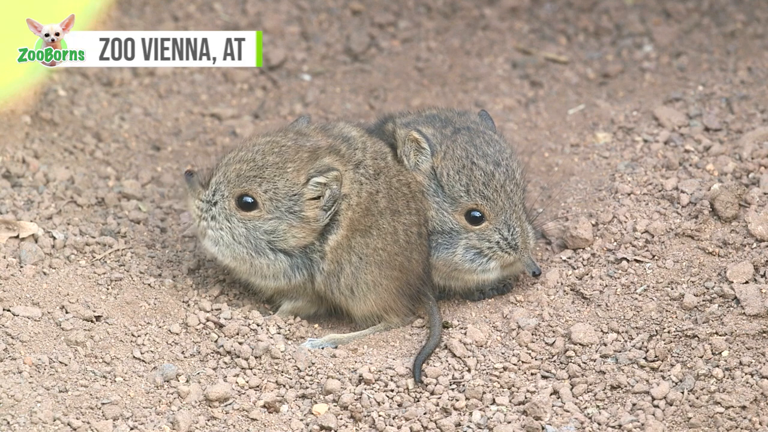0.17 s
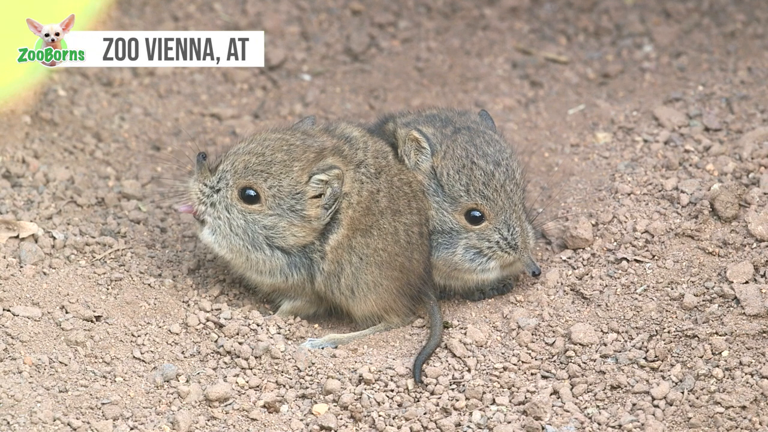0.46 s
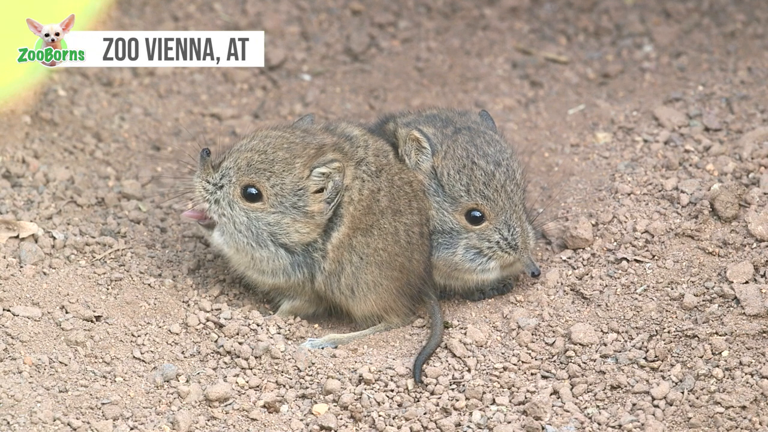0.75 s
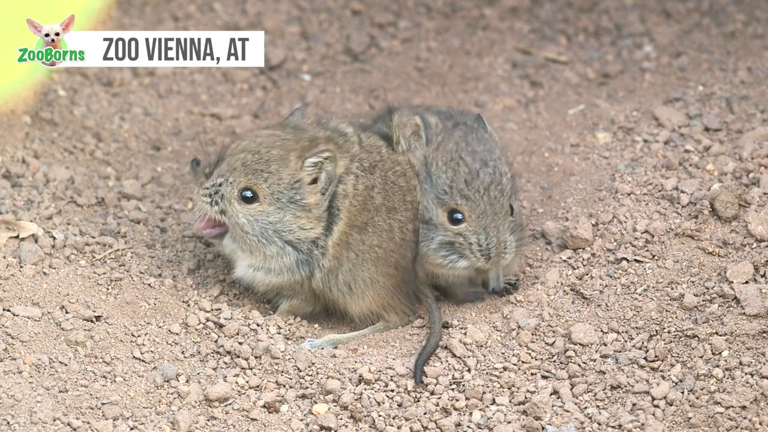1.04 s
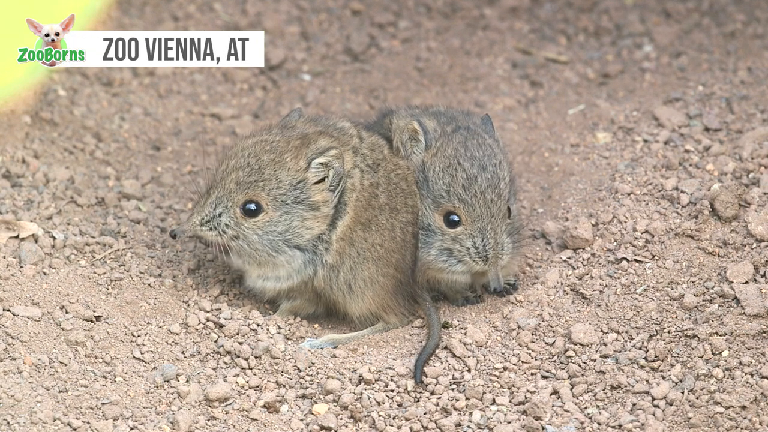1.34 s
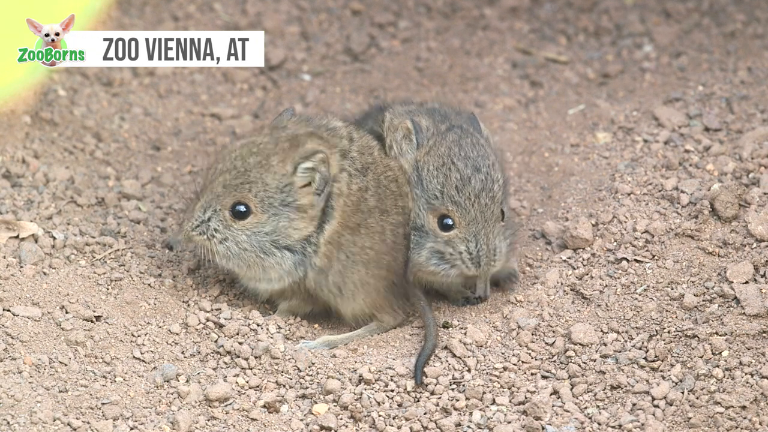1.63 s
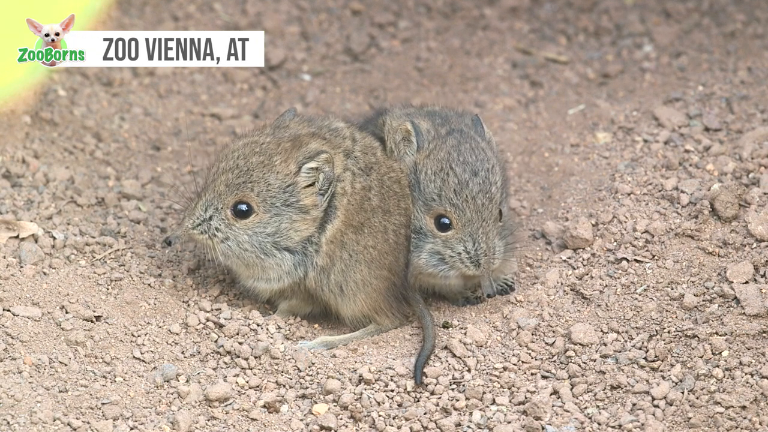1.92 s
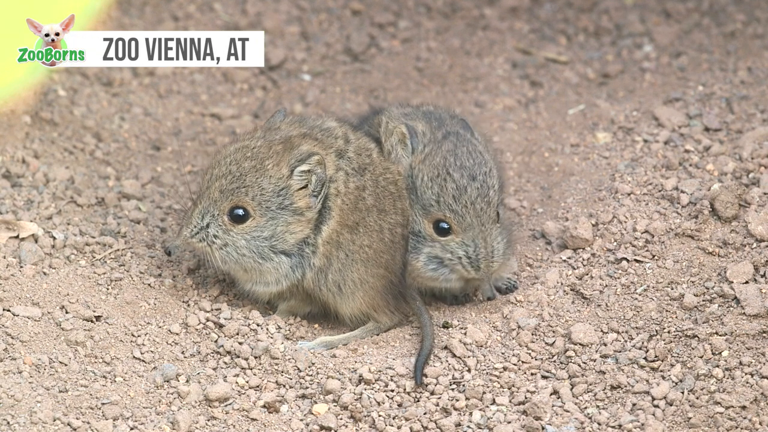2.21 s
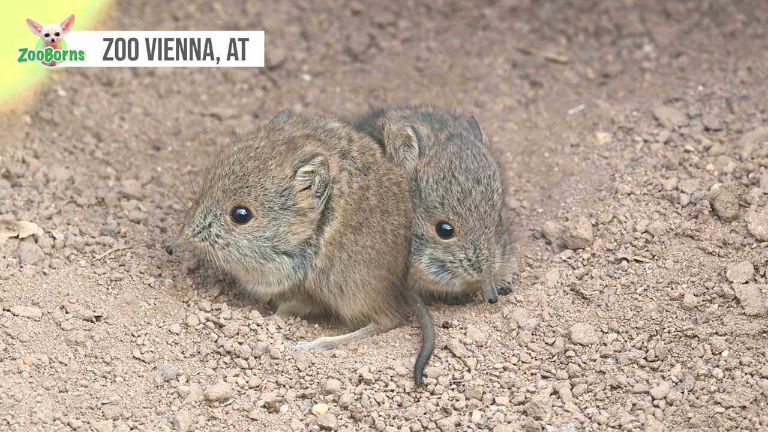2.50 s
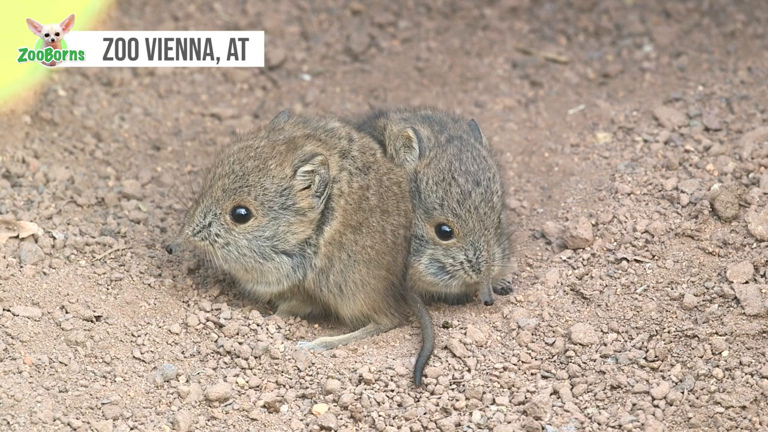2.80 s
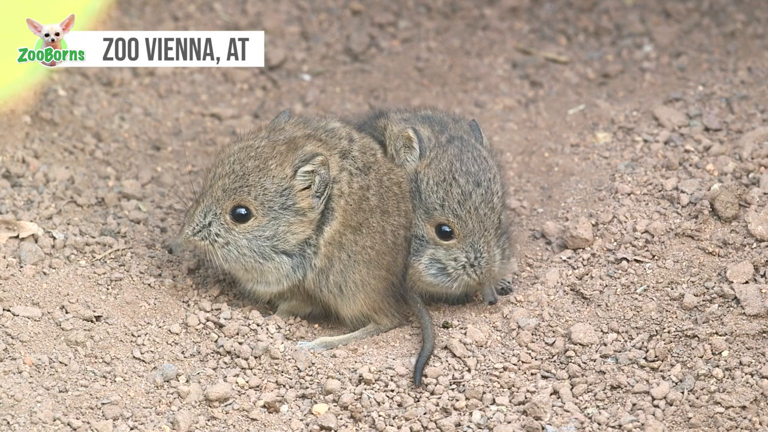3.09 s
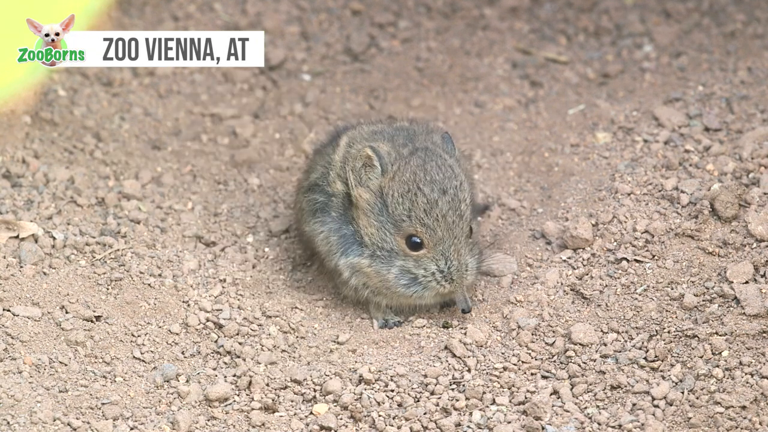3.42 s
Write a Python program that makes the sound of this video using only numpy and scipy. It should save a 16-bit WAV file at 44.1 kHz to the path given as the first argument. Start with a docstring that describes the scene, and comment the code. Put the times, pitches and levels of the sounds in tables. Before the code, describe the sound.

Small birds chirp and twitter in an echoing indoor enclosure, over a distant flock and faint ventilation. In the first second a near bird gives two thin whistles, while others screech and rasp farther off and a nasal call breaks upward. Low squawks join at 1.3 seconds, and the calls ease around 2. From 2.5 seconds come another nasal call, a steeply falling chirp and a last flurry.

```python
"""Small birds call across an echoing indoor enclosure, in mono, over faint ventilation and a far flock.
In the first second a near bird gives two thin whistles, while others chirp, screech and rasp farther
off and a nasal call breaks upward. Low squawks join at 1.3 s, and the calls ease off around 2 s.
From 2.5 s come a second nasal call, a steeply falling chirp and a last flurry. The voices are
fluttering tones and shaped noise, each ringing on in the hall."""
import sys
import numpy as np
from scipy import signal
from scipy.fft import rfft, irfft, next_fast_len
from scipy.io import wavfile
from scipy.ndimage import map_coordinates

SR = 44100
rng = np.random.default_rng(int(sys.argv[2]) if len(sys.argv) > 2 else 0)


def waveform_to_disk(signal):
    """Save audio, clipped to [-1, 1], as 16-bit WAV at the path in sys.argv[1]."""
    frames = np.transpose(np.atleast_2d(signal))
    scaled = np.clip(frames, -1, 1) * 32767
    samples = np.round(scaled).astype(np.int16)
    wavfile.write(sys.argv[1], SR, samples)


N = 156555
LEAD = SR // 2  # pre-roll, so the hall is already ringing at the start
TIME = np.arange(-LEAD, N + SR) / SR


def amp(db):
    """Decibels to gain."""
    return 10 ** (np.asarray(db) / 20)


def unit(x):
    """Scale to rms 1."""
    return x / np.sqrt(np.mean(x ** 2) + 1e-20)


def along(points, hz):
    """Read a curve of (freq_hz, value) points on a log frequency axis."""
    freqs, values = np.transpose(points)
    return np.interp(np.log(hz + 1), np.log(freqs + 1), values)


def fader(points):
    """Gain over the whole scene from (time_s, level_db) points."""
    return amp(np.interp(TIME, *np.transpose(points)))


def wobble(size, rate_hz):
    """A smooth random curve with rate_hz knots a second."""
    knots = rng.standard_normal(size // 4 + 8)
    return map_coordinates(knots, [np.arange(size) * rate_hz / SR], mode='mirror')


def noise(size, colour):
    """Noise of rms 1, shaped by an EQ curve."""
    eq = amp(along(colour, np.fft.rfftfreq(size, 1 / SR)))
    return unit(irfft(rfft(rng.standard_normal(size)) * eq, size))


def note(length_s, edge=0.147):
    """Progress 0-1 through a note, and an envelope whose fades each take the share `edge` of it."""
    progress = np.linspace(0, 1, int(length_s * SR))
    return progress, np.sin(np.pi / 2 * np.clip(np.minimum(progress, 1 - progress) / edge, 0, 1))


# Reverb time of the hall: freq_hz, t60_s
HALL_DECAY = [(300, 0.72), (1500, 2.58), (3500, 1.352), (5000, 1.232), (6500, 0.636), (12000, 0.414)]


def place_in_hall(track, start_s, call, direct_db, echo_db):
    """Mix in a call: the direct sound plus a diffuse tail whose mids ring longest."""
    hz, t, spectrum = signal.stft(rng.standard_normal(SR), SR, nperseg=256)
    decay = amp(-60 * t / along(HALL_DECAY, hz)[:, None])
    build_up = 1 - np.exp(-t / 0.0021)
    tail = signal.istft(spectrum * decay * build_up, SR, nperseg=256)[1]
    impulse = amp(echo_db) * tail / np.linalg.norm(tail)
    impulse[0] += amp(direct_db)
    part = track[LEAD + round(start_s * SR):]
    heard = signal.fftconvolve(call, impulse)[:len(part)]
    part[:len(heard)] += heard


# Second and third harmonic of a loud chirp, relative to its fundamental: gain_db
OVERTONES_DB = [-30, -38]


def syrinx(hz, rough, flutter_hz, shimmer_db, bright_db=-8.5):
    """A bird's voice: a tone with weak overtones, fluttering in pitch (by the share `rough`) and level."""
    phase = 2 * np.pi * np.cumsum(hz * (1 + rough * wobble(len(hz), flutter_hz))) / SR
    overtones = sum(amp(db + bright_db) * np.sin(k * phase) for k, db in enumerate(OVERTONES_DB, 2))
    shimmer = amp(shimmer_db * wobble(len(hz), 352.43))
    return unit((np.sin(phase) + overtones) * shimmer)


# EQ of the low rush and of the hiss: freq_hz, gain_db
RUSH_EQ = [(25, -8), (45, -1), (90, 0), (170, 2), (300, -5.5), (500, -8.5), (700, -7), (1100, -19.5),
           (3000, -37.5)]
HISS_EQ = [(1100, -6.5), (2200, 7.5), (6000, -1.5), (9000, -16.5), (15000, -29.5)]
# Fader moves of the rush and of the hum: time_s, level_db
RUSH_LEVELS = [(.2, -59), (1.55, -54.5), (2.4, -57.5), (3.5, -56.5)]
HUM_LEVELS = [(0, -84.5), (.3, -58.5), (1.3, -63.5), (3.0, -66.5), (3.5, -57)]


def ventilation(hum_hz=63.5, hiss_db=-54.5):
    """Room tone: a low rush of air, a faint hiss and a wavering hum."""
    size = len(TIME)
    hz = hum_hz * (1 + 0.02272 * wobble(size, 4.473))
    hum = np.sin(2 * np.pi * np.cumsum(hz) / SR) * amp(1.6 * wobble(size, 6.18))
    rush = fader(RUSH_LEVELS) * noise(size, RUSH_EQ)
    hiss = amp(hiss_db) * noise(size, HISS_EQ)
    return rush + hiss + fader(HUM_LEVELS) * unit(hum)


# Fader moves of the distant flock: time_s, level_db
FLOCK_LEVELS = [(0, -38.5), (.6, -46), (1.2, -42.5), (1.7, -42.5), (2.0, -48), (2.45, -47), (2.8, -37.5),
                (3.55, -44.5)]


def flock(count=110, centre_hz=3421, spread=.16):
    """A twittering bed: many far chirps blur in the hall."""
    twitter, out = np.zeros(len(TIME)), np.zeros(len(TIME))
    for k, (jitter, stretch, pitch, glide) in enumerate(rng.uniform(-1, 1, (count, 4))):
        progress, env = note(.07 + 0.03124 * stretch)
        hz = centre_hz * np.exp(spread * (1.6 * pitch + glide * (progress - .5)))
        onset = int((k + 1 + jitter) / count * (N + LEAD))
        twitter[onset:][:len(env)] += env * syrinx(hz, rough=.035, flutter_hz=897.6, shimmer_db=8.0)
    place_in_hall(out, -LEAD / SR, twitter, direct_db=-2.0, echo_db=4)
    return out / np.std(out[LEAD:LEAD + N]) * fader(FLOCK_LEVELS)


# Rasp cues: start_s, length_s, level_db
RASPS = [(0.297, 0.017, -58), (0.414, 0.253, -59.5), (0.775, 0.0425, -51), (0.901, 0.139, -52),
         (1.18, 0.064, -53), (1.327, 0.133, -53), (1.854, 0.085, -51), (2.083, 0.0744, -53.5),
         (2.515, 0.108, -53.5), (3.081, 0.164, -56), (3.306, 0.342, -57.5)]
# EQ of a rasp: freq_hz, gain_db
RASP_EQ = [(3000, -57), (5000, 10.5), (5900, 9), (7000, -1), (8500, -7.5), (12000, -18), (15500, -37.5)]


def rasps():
    """Toneless, trembling hisses that sit above the chirps."""
    out = np.zeros(len(TIME))
    for start_s, length_s, level_db in RASPS:
        _, env = note(length_s)
        hiss = unit(noise(len(env), RASP_EQ) * amp(1.9 * wobble(len(env), 200)))
        place_in_hall(out, start_s, amp(level_db) * env * hiss, direct_db=-1.5, echo_db=0.0)
    return out


# Squawk cues: start_s, length_s, edge_pitch_hz, top_pitch_hz, level_db
SQUAWKS = [(1.298, .16, 999, 1903, -43.5), (1.599, 0.21, 1650, 1789, -54.5),
           (3.079, 0.10974, 1604, 1899, -42.5), (3.17, 0.173, 1504, 1589, -52)]


def squawks():
    """Low hoarse calls whose pitch arches up and back down."""
    out = np.zeros(len(TIME))
    for start_s, length_s, edge_hz, top_hz, level_db in SQUAWKS:
        progress, env = note(length_s, edge=0.63)
        hz = edge_hz + (top_hz - edge_hz) * np.sin(np.pi * progress)
        tone = syrinx(hz, rough=0.0999, flutter_hz=700.4, shimmer_db=5)
        place_in_hall(out, start_s, amp(level_db) * env * tone, direct_db=-1.5, echo_db=-5.5)
    return out


# Nasal call cues: start_s, length_s, low_pitch_hz, high_pitch_hz, level_db
NASAL_CALLS = [(0.506, 0.466, 605.6, 1089, -42), (2.513, 0.413, 637.1, 1109, -43)]
# Throat resonance that shapes their harmonics: freq_hz, gain_db
NASAL_THROAT = [(600, -19), (1100, -14), (2300, -2), (3200, 1.5), (4500, -7.5), (7000, -37.5), (12000, -57)]


def nasal_calls(break_s=.17, break_width_s=.018, soft_start_db=-3, hoarseness=.125):
    """A soft reedy note breaks upward into a louder, hoarse one."""
    out = np.zeros(len(TIME))
    for start_s, length_s, low_hz, high_hz, level_db in NASAL_CALLS:
        progress, env = note(length_s, edge=0.181)
        broken = 1 / (1 + np.exp((break_s - progress * length_s) / break_width_s))  # 0 before, 1 after
        flutter = (0.0169 + hoarseness * broken) * wobble(len(env), 700)
        hz = (low_hz + (high_hz - low_hz) * broken) * (1 + flutter)
        phase = 2 * np.pi * np.cumsum(hz) / SR
        tone = unit(sum(amp(along(NASAL_THROAT, k * hz)) * np.sin(k * phase) for k in range(1, 11)))
        gain = amp(level_db + soft_start_db * (1 - broken))
        place_in_hall(out, start_s, gain * env * tone, direct_db=-3, echo_db=0)
    return out


# Screech cues: start_s, length_s, start_pitch_hz, end_pitch_hz, level_db
SCREECHES = [(-.1, 0.213, 3626, 3621, -44.5), (0.417, 0.203, 3969, 3200, -38),
             (.62, 0.16, 2785, 2600, -41.5), (.77, 0.1115, 4618, 3383, -40),
             (0.958, 0.141, 3768, 3550, -39.5), (1.308, 0.05344, 4867, 4457, -36),
             (1.351, 0.081, 3755, 3087, -38), (1.403, 0.1624, 3685, 3502, -36.5),
             (1.624, 0.1164, 3393, 3322, -42), (2.084, 0.0827, 4670, 3766, -45),
             (2.527, 0.24, 4337, 3805, -36), (2.75, 0.214, 4333, 3460, -42),
             (3.074, 0.058, 5313, 4590, -38), (3.099, 0.0807, 3923, 3416, -32.5),
             (3.196, 0.3334, 3820, 4268, -40)]
# Throat resonance that shapes their breath: freq_hz, gain_db
SCREECH_THROAT = [(1700, -27.5), (2600, -4), (3400, -1.5), (5000, -4.5), (5800, -22.5), (8000, -33.5),
                  (14000, -45)]


def screeches(breath_db=-0.5):
    """Torn, swelling cries, half rough tone and half rushing air, with plenty of echo."""
    out = np.zeros(len(TIME))
    for start_s, length_s, start_hz, end_hz, level_db in SCREECHES:
        progress, env = note(length_s, edge=0.304)
        hz = start_hz + (end_hz - start_hz) * progress
        tone = syrinx(hz, rough=0.08957, flutter_hz=1366.9, shimmer_db=0.0)
        breath = unit(noise(len(env), SCREECH_THROAT) * amp(2.46 * wobble(len(env), 297.46)))
        cry = unit(tone + amp(breath_db) * breath)
        place_in_hall(out, start_s, amp(level_db) * env * cry, direct_db=-1.5, echo_db=-2.0)
    return out


# Chirp cues: start_s, length_s, start_pitch_hz, end_pitch_hz, level_db (before roll-off), rough_share
CHIRPS = [(0.166, 0.078, 3502, 2861, -34.5, 0.0625), (0.228, 0.119, 2955, 3690, -41.5, 0.0615),
          (0.343, 0.0671, 3740, 3680, -34.5, 0.0187), (0.808, 0.0754, 3790, 3630, -36, 0.0317),
          (1.197, 0.085, 3215, 3418, -39.5, 0.049), (1.219, 0.042, 4380, 4270, -42, 0.0234),
          (1.347, .07, 3890, 2918, -35, 0.0609), (1.844, 0.0291, 3120, 2773, -41.5, 0.0533),
          (1.886, 0.06, 3000, 2957, -44, 0.04), (1.974, 0.1144, 2923, 2641, -49, 0.0514),
          (2.122, 0.064, 3467, 3500, -40.5, 0.0536), (2.124, 0.082, 4190, 4185, -56.5, 0.0134),
          (2.221, 0.21, 3507, 3111, -51.5, 0.0321), (2.366, 0.071, 1920, 2074, -60.5, 0.0234),
          (2.718, 0.1577, 5900, 2686, -32.5, 0.05194), (3.116, 0.0658, 3526, 2964, -34.5, 0.0405),
          (3.174, 0.1534, 2990, 2869, -42.5, 0.0322), (3.202, 0.0227, 1700, 835, -52.5, 0.13),
          (3.469, 0.068, 2900, 3074, -43, 0.026)]
# A chirp weakens at the top of its range: pitch_hz, gain_db
CHIRP_ROLLOFF = [(4800, 0.5), (5900, -26.5)]


def chirps(loud_db=-31, dulling_db_per_db=1.5):
    """Short gliding notes from the middle distance; the louder, the brighter."""
    out = np.zeros(len(TIME))
    for start_s, length_s, start_hz, end_hz, level_db, rough in CHIRPS:
        progress, env = note(length_s)
        hz = start_hz + (end_hz - start_hz) * progress
        bright_db = dulling_db_per_db * (level_db - loud_db)
        tone = syrinx(hz, rough, flutter_hz=692.5, shimmer_db=2.5, bright_db=bright_db)
        gain = amp(level_db + along(CHIRP_ROLLOFF, hz))
        place_in_hall(out, start_s, gain * env * tone, direct_db=0.0, echo_db=-3.5)
    return out


# Pulsing envelopes, one list per whistle: time_s, level_db
WHISTLE_LEVELS = [
    [(.12, -46), (.148, -27.5), (.163, -45), (.195, -30.5), (.212, -29), (.254, -55.5), (.272, -34),
     (.36, -41.5), (.405, -54.5)],
    [(.595, -50.5), (.617, -34), (.633, -38), (.647, -22.5), (.665, -46), (.686, -26.5), (.70, -49.5),
     (.713, -38), (.735, -34.5), (.756, -56), (.768, -40), (.795, -35.5), (.803, -45.5)],
]
# Tuning, one row per whistle: rest_pitch_hz, drop_hz, waver_share
WHISTLE_TUNING = [(4200, 86, 0.0022), (4239, 286.6, 0.0063)]


def whistles(settle_s=0.02713, push_s=.052, push_width_s=.022, relaxed_db=-17.5, shimmer_db=2):
    """A near bird settles down onto one thin note; its third harmonic sparkles on the first push."""
    out = np.zeros(len(TIME))
    for envelope, (rest_hz, drop_hz, waver) in zip(WHISTLE_LEVELS, WHISTLE_TUNING):
        times_s, levels_db = np.transpose(envelope)
        start_s = times_s[0]
        t = np.arange(0, times_s[-1] - start_s, 1 / SR)
        hz = (rest_hz + drop_hz * np.exp(-t / settle_s)) * (1 + waver * wobble(len(t), 230))
        phase = 2 * np.pi * np.cumsum(hz) / SR
        gain = amp(np.interp(t + start_s, times_s, levels_db) + shimmer_db * wobble(len(t), 239))
        push = np.maximum(np.exp(-((t - push_s) / push_width_s) ** 2), amp(relaxed_db))
        tone = gain * (np.sin(phase) + amp(-47) * np.sin(2 * phase))
        sparkle = gain.mean() * amp(-42.5) * push * np.sin(3 * phase)
        call = np.sqrt(2) * (tone + sparkle) * signal.windows.tukey(len(t), .06)
        place_in_hall(out, start_s, call, direct_db=0.0, echo_db=-9.5)
    return out


def scene():
    """All birds over the room tone, the same in both channels."""
    birds = whistles() + chirps() + screeches() + nasal_calls() + squawks() + rasps() + flock()
    mono = birds + ventilation()
    return np.tile(mono[LEAD:LEAD + N], (2, 1))


def record(dry):
    """A brick-wall low-pass on the mix."""
    cutoff_hz = 15800
    size = next_fast_len(N + LEAD)
    passband = np.fft.rfftfreq(size, 1 / SR) < cutoff_hz
    return irfft(rfft(dry, size) * passband, size)[:, :N]


dry = scene()
out = record(dry)
waveform_to_disk(out)
```